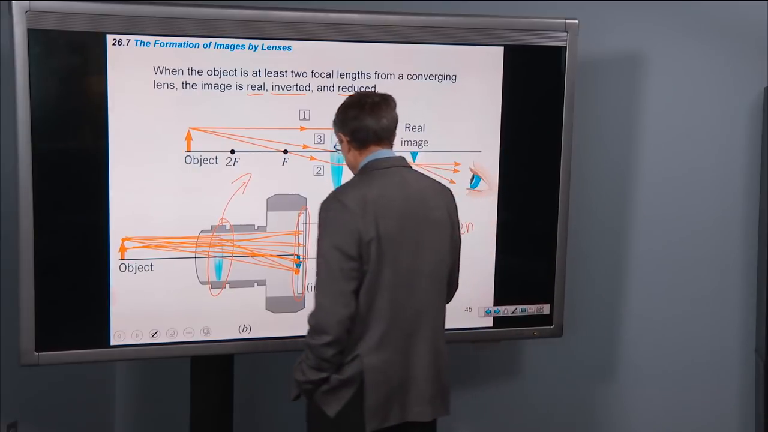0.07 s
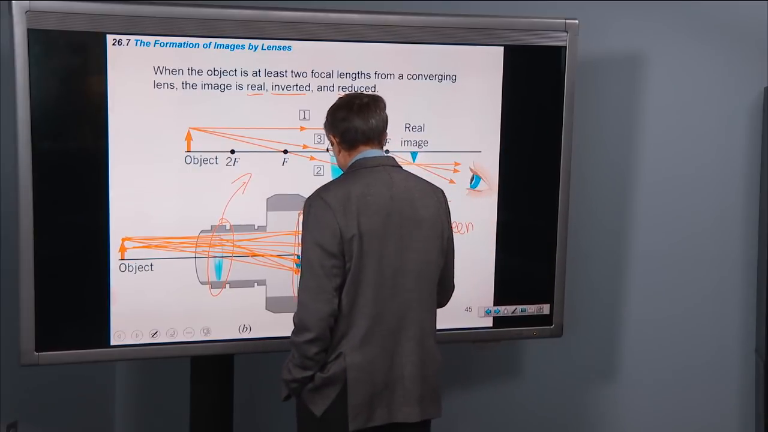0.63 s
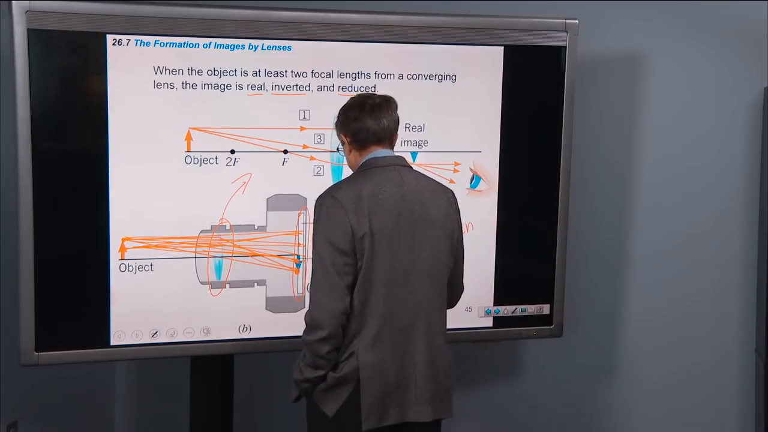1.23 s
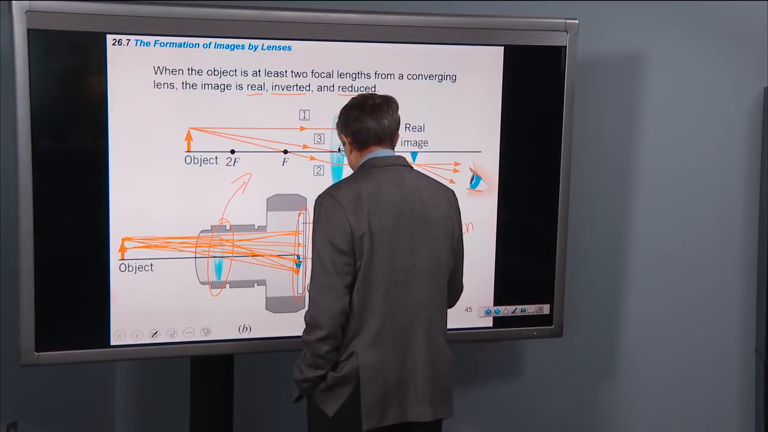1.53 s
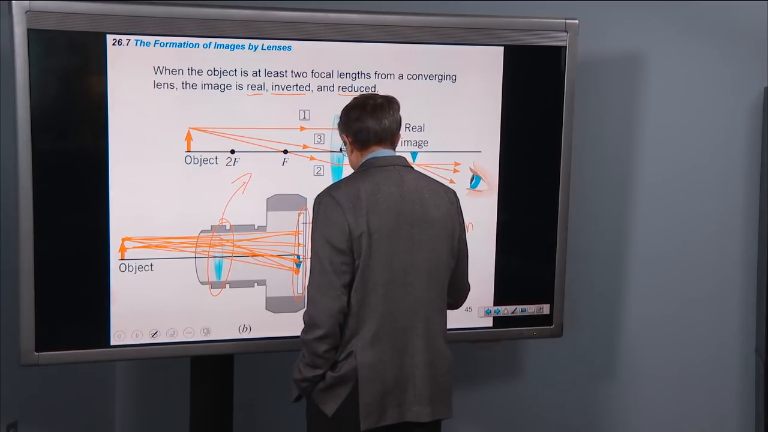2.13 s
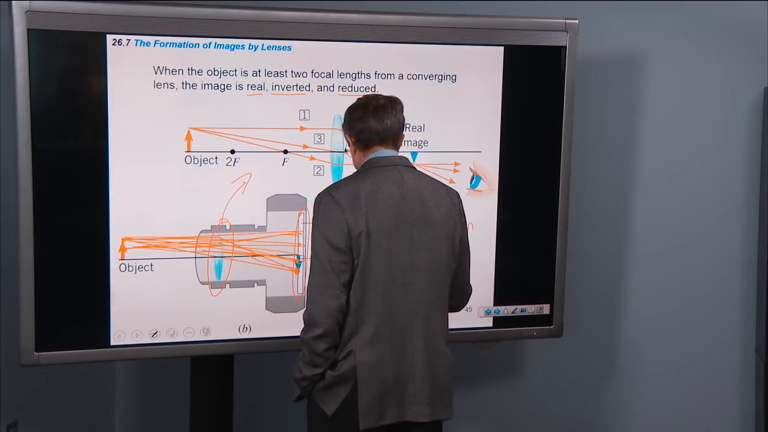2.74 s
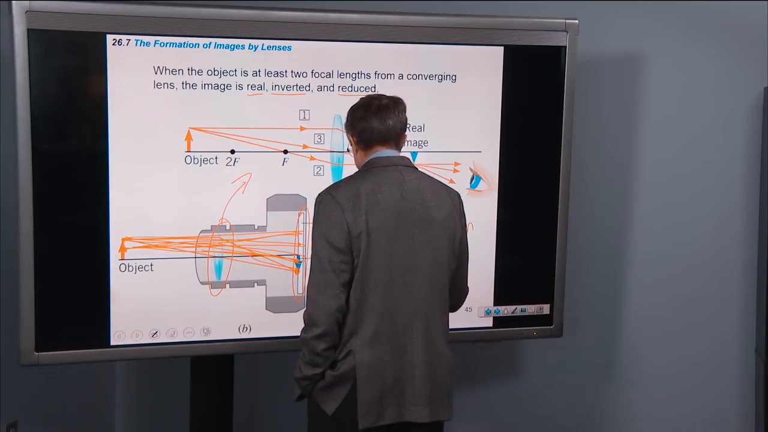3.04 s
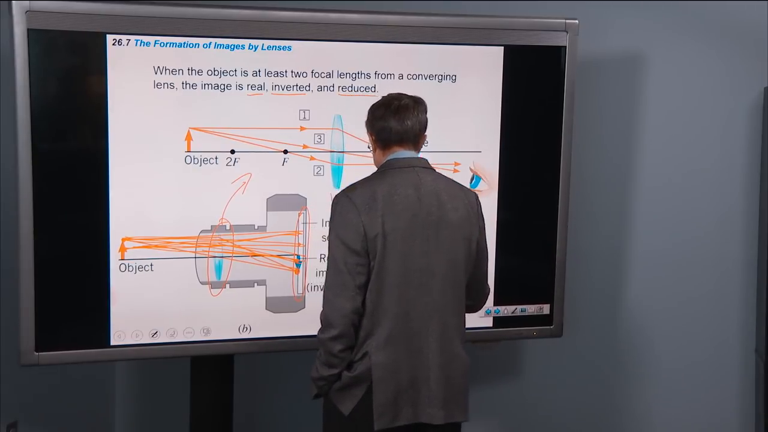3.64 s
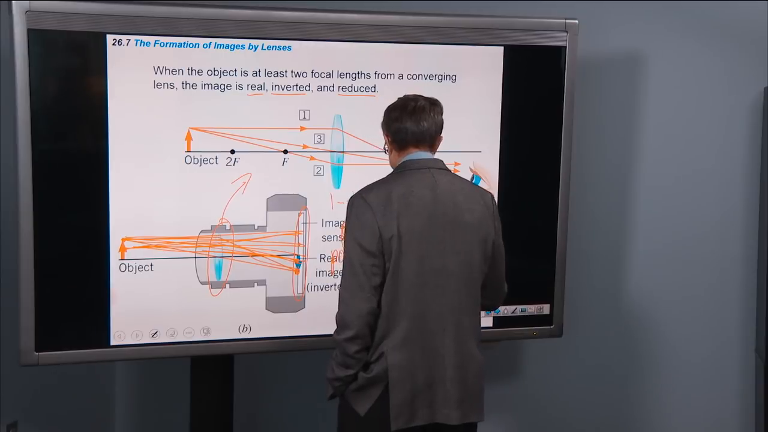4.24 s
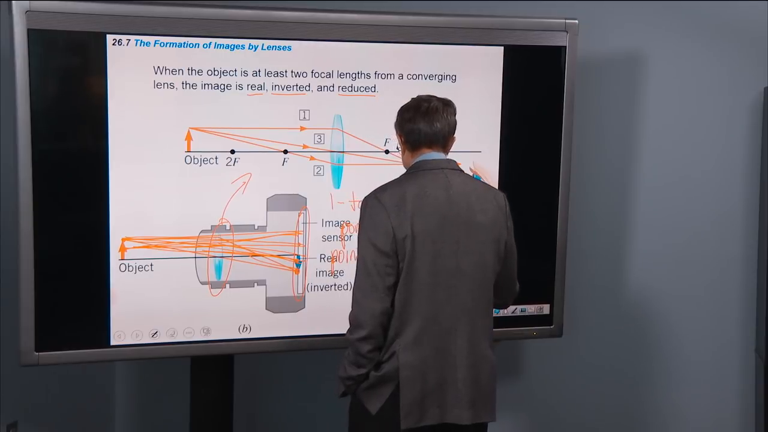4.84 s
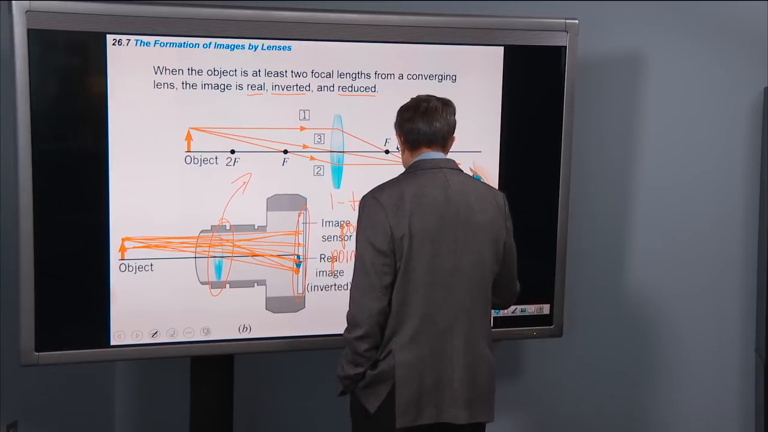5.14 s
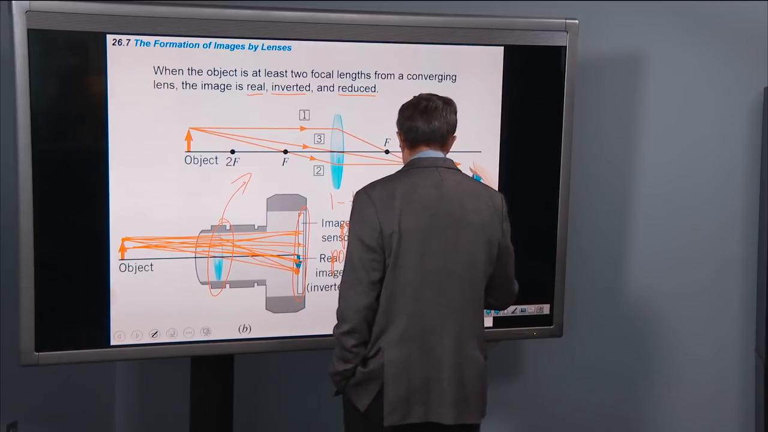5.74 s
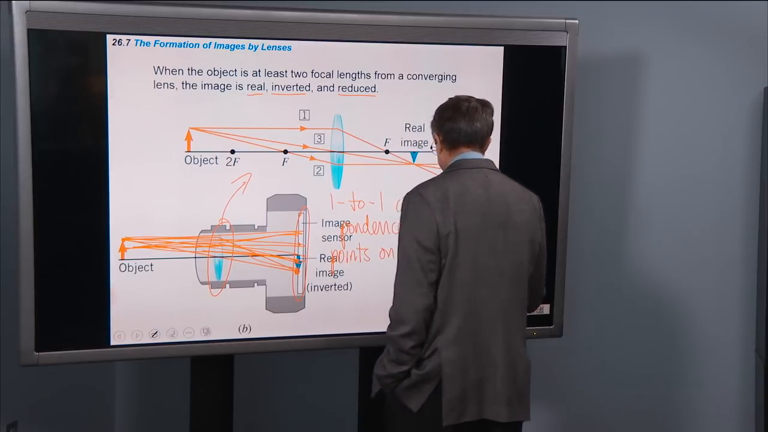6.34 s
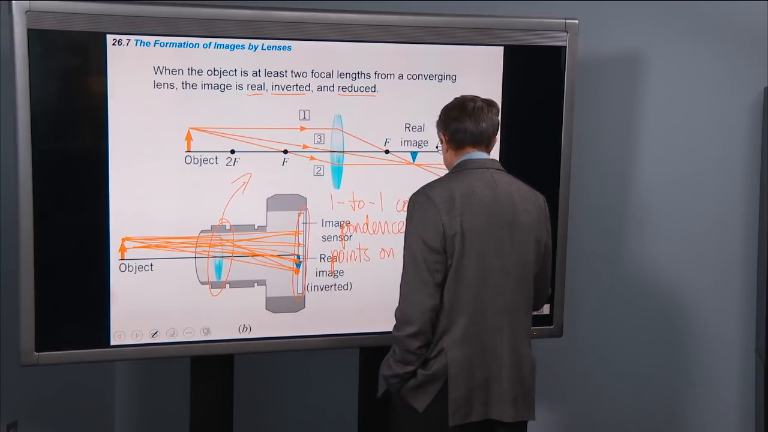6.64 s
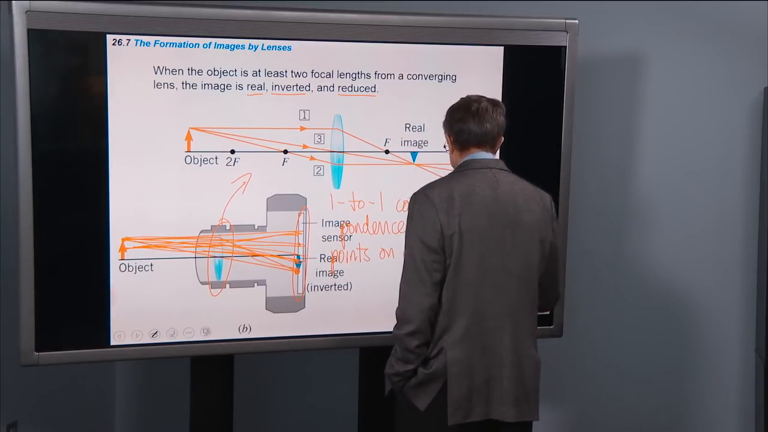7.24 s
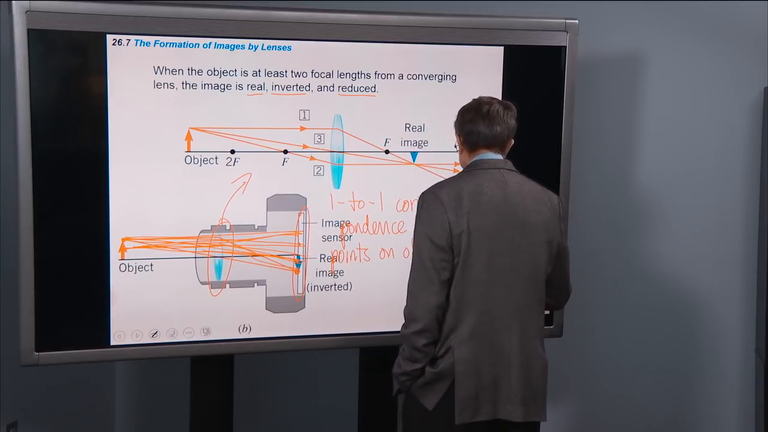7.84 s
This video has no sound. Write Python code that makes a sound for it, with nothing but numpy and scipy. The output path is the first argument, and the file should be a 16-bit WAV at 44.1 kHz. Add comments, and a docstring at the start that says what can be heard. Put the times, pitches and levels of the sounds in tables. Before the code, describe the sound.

A plastic stylus taps, rattles and scrapes on a large glass touchscreen, each tap knocking hollowly over soft ventilation hum.

```python
"""A quiet lecture room: someone writes with a plastic stylus on a wall-sized touchscreen.
Each touch is a sharp tick of the tip, then, a few ms later as the tip bottoms out, a clack and the hollow
knock of the glass panel. The loose tip rattles as it lands and slides, and at the very end it skids hard.
The writer steps along to the right with a shuffle and a rustle of the jacket. A faint squeak fades at the
start, a short breathy rush with a few dry clicks passes later, and ventilation hums behind it all."""
import sys
import numpy as np
from scipy import signal
from scipy.fft import rfft, irfft
from scipy.io import wavfile

SR = 44100
rng = np.random.default_rng(int(sys.argv[2]) if len(sys.argv) > 2 else 0)


def output_pcm(signal):
    """Save a mono or channel-first signal as 16-bit PCM at the path in sys.argv[1].

    Samples are clipped to [-1, 1] before scaling.
    """
    pcm = np.clip(np.atleast_2d(signal).T, -1, 1) * 32767
    wavfile.write(sys.argv[1], SR, np.round(pcm).astype(np.int16))


N = 352800
TIME = np.arange(N) / SR
USUAL_KNOCK_DB = -12

# the tip sliding on the glass: (start [s], end [s], level [dB])
STROKES = [(0.837, .884, -56.5), (1.058, 1.104, -57), (1.485, 1.561, -57), (2.14, 2.221, -55),
           (2.422, 2.532, -56.5), (3.05, 3.151, -57), (3.516, 3.54, -53.5), (3.708, 3.754, -56.5),
           (3.986, 4.074, -64), (5.685, 5.718, -54.5), (6.119, 6.156, -60), (6.624, 6.714, -59),
           (6.926, 7.007, -53.5), (7.312, 7.354, -57.5), (7.505, 7.581, -57), (7.737, 7.776, -55.5)]
# ring of the loose tip: (frequency [Hz], t60 [s], level [dB])
TIP_MODES = [(2034, 0.04, -11), (3296, 0.035, -11), (4260, 0.048, -20), (5300, 0.017, -0.5),
             (5440, 0.016, -13), (8560, 0.0084, -1.5), (9090, 0.016, -3), (9650, 0.0085, -18)]
# colour of a small, hard tick: (frequency [Hz], level [dB])
TICK_COLOUR = [(300, 15), (550, 8), (1200, -7), (3500, 3), (4400, -14.5), (7000, -6), (10000, -29),
               (15000, -55)]


def panel_knocks(times, db, place):
    """The glass flexes once; waves return from the frame and ring in modes set by the place struck."""
    # the first broad flexing under the pen: (frequency [Hz], t60 [s], level [dB])
    flex_modes = [(155, 0.037, -2), (470, 0.018, -0.5)]
    # ring of the glass: (frequency [Hz], t60 [s], level struck left [dB], level struck right [dB])
    glass_modes = [(105.1, 1, -34, -30.5), (139.3, 0.46, -15.5, -24), (167.85, 0.6, -39, -19),
                   (191.2, 0.26, -58, -21), (222.5, 0.73, -42, -23), (243, 0.14, -36, -21.5),
                   (290.6, 0.44, -28.5, -46), (356.5, 0.1, -15, -11), (422, 0.16, -17, -16),
                   (447, 0.056, -13.5, -21.5), (485.6, 0.24, -26.5, -19), (520, 0.036, -24, -37),
                   (575, 0.23, -39, -21.5), (640.5, 0.33, -35, -35), (931, 0.086, -25.5, -29),
                   (985, 0.13, -38, -27.5), (1194, 0.037, -23.5, -52)]
    # colour of the many weaker modes, blurred into a thud: (frequency [Hz], level [dB])
    thud_colour = [(25, -9), (60, -8), (90, 15), (130, -3), (230, -28), (310, 0.5), (400, 3), (520, -2),
                   (660, -6), (780, -17.5), (980, -22), (1500, -23), (3000, -55), (12000, -63)]
    blows = clicks(times, from_db(db))
    flex = sum((-1) ** k * from_db(level) * ring(blows, hz, t60)
               for k, (hz, t60, level) in enumerate(flex_modes))
    # a panel radiates its slowest motion poorly
    flex = signal.sosfilt(signal.butter(1, 85, "high", fs=SR, output="sos"), flex)
    returns = times + .00434  # back from the frame
    spread_db = 2 * rng.standard_normal((len(times), len(glass_modes)))
    ringing = 0
    for k, (hz, t60, left_db, right_db) in enumerate(glass_modes):
        strength = from_db(db + left_db + (right_db - left_db) * place + spread_db[:, k] - 1)
        ringing += (-1) ** k * ring(clicks(returns, strength), hz, t60)
    thud = swell(clicks(returns, from_db(db)), t60=.1, build_s=.018) * noise(thud_colour)
    return flex + ringing + from_db(-14.5) * thud


def tip_ticks(times, db):
    """Plastic meets glass: a short crack, the ring of the barrel and the crack's echo in the room."""
    # ring of the pen barrel: (frequency [Hz], t60 [s], level [dB])
    barrel_modes = [(1150, 0.0079, 12), (1310, 0.036, -3.5), (1583, 0.019, 1.5), (2081, 0.017, 2.5),
                    (3000, 0.002, 3), (2880, 0.011, 2.5), (3240, 0.0049, 10), (3524, 0.019, 0.5),
                    (4730, 0.018, 3), (6460, 0.0068, 0.5)]
    # the tick as the room returns it: (frequency [Hz], level [dB])
    echo_colour = [(300, 19.5), (550, -8), (1200, 6), (3500, -3.5), (4400, -6), (7000, -15), (10000, -35),
                   (15000, -55)]
    blows = clicks(times, from_db(db))
    crack = from_db(1.5) * swell(blows, t60=.035, build_s=.0053) * noise(TICK_COLOUR)
    early = from_db(-14.5) * swell(blows, t60=.15, build_s=.02)
    late = from_db(-22) * swell(blows, t60=.27, build_s=.04)
    return crack + (early + late) * noise(echo_colour) + pen_ring(times, db - 10, barrel_modes)


def tip_travel_s(knock_db, usual_s=.0038, longest_s=.0047, halving_db=9):
    """Time from first touch to bottoming out: a faster pen knocks harder and gets there sooner."""
    return np.minimum(usual_s * 2 ** ((USUAL_KNOCK_DB - knock_db) / halving_db), longest_s)


def tip_clacks(times, knock_db, growth=1.86):
    """The tip bottoms out; harder blows make shorter contact, so the clack grows faster than the knock."""
    # colour of the clack: (frequency [Hz], level [dB])
    colour = [(500, -17), (800, -4), (1000, 2), (1700, 6), (2300, -8), (3200, 0.5), (4500, -14),
              (8000, -19), (11000, -29), (15000, -50)]
    blows = clicks(times, from_db(growth * knock_db - 14))
    hit = swell(blows, t60=.026, build_s=.0032)
    tail = from_db(-21) * swell(blows, t60=.19, build_s=.028)
    return (hit + tail) * noise(colour)


def tip_rattles(landing, knock_db):
    """The loose tip knocks in its barrel, thin and bright, with a little room behind it."""
    # single clicks as the pen lifts or turns: (time [s], level [dB])
    flicks = [(0.3591, -52), (0.62, -53), (1.075, -42.5), (1.493, -39), (1.5576, -35), (1.9809, -46),
              (2.705, -52), (3.5253, -36), (4.4754, -50.5), (4.9227, -39), (5.108, -47), (6.1482, -39),
              (6.3949, -47), (7.008, -35), (7.3372, -38.5), (7.7427, -39), (7.9713, -34)]
    hits = jolts(landing, knock_db) + [(s, db - 6) for s, db in flicks] + shakes()
    times, db = np.transpose(hits)
    blows = clicks(times, from_db(db))
    envelope = from_db(-6) * dying(blows, t60=.019) + from_db(-27.5) * dying(blows, t60=.044)
    # colour of the rattle: (frequency [Hz], level [dB])
    colour = [(1500, -5.5), (3200, -10), (4200, 11.5), (5400, 5), (7300, 1.5), (9200, 4.5), (10300, -5),
              (15000, -29)]
    return envelope * noise(colour) + pen_ring(times, db - 3, TIP_MODES)


def jolts(landing, knock_db, delay_s=.0004, rebound_s=.0065, rebound_loss_db=4.5):
    """Each landing throws the loose tip at its barrel, with one rebound: (time [s], level [dB])."""
    times = landing + delay_s
    db = -35 + .71 * (knock_db - USUAL_KNOCK_DB)
    rebounds = times + rebound_s * rng.uniform(.5, 1.5, len(times))
    return [*zip(times, db), *zip(rebounds, db - rebound_loss_db)]


def shakes(count=16, gap_s=.011, over_rub_db=2, spread_db=2):
    """Sliding shakes the loose tip at uneven intervals: (time [s], level [dB])."""
    hits = []
    for start, end, db in STROKES:
        times = start + gap_s * (np.arange(count) + rng.random(count))
        levels = db + over_rub_db + spread_db * rng.standard_normal(count)
        hits += [(s, level) for s, level in zip(times, levels) if s < end]
    return hits


def pen_ring(times, db, modes):
    """Each contact strikes every mode with a strength and sign of its own."""
    chance = rng.standard_normal((len(times), 2, len(modes)))
    strength = np.sign(chance[:, 0]) * from_db(2.6 * chance[:, 1])
    return sum(ring(clicks(times, strength[:, k] * from_db(db + level)), hz, t60)
               for k, (hz, t60, level) in enumerate(modes))


def tip_rubbing(slips_per_s=400):
    """The sliding tip catches and slips at random, many times a stroke, and each slip rings it."""
    # colour of plastic rubbing on glass: (frequency [Hz], level [dB])
    colour = [(1500, -30), (3200, 19), (4000, -3), (5400, 16), (7000, -1), (9200, -1), (10200, -64),
              (14000, -40)]
    pressure = sum(from_db(db) * ((TIME > start) & (TIME < end)) for start, end, db in STROKES)
    slips = pressure * (rng.random(N) < slips_per_s / SR) * rng.standard_normal(N)
    ringing = sum(ring(slips, hz, t60) * from_db(level) for hz, t60, level in TIP_MODES)
    return from_db(-2.5) * dying(slips, t60=.019) * noise(colour) + from_db(-8.5) * ringing


def tip_skid(slips_per_s=1500):
    """Pressed hard, the tip chatters over the glass in fast, uneven slips."""
    # force of the skid: (time [s], relative level [dB])
    push = [(7.982, -90), (7.984, -33), (7.988, -35), (8.0, -32)]
    # colour of the scrape: (frequency [Hz], level [dB])
    colour = [(400, -11), (790, 16), (1300, -40), (2250, 10), (2700, 0), (3800, -7), (5300, -18),
              (7000, -8), (9200, -7), (14500, -27)]
    force = from_db(np.interp(TIME, *np.transpose(push), left=-200))
    slips = (rng.random(N) < slips_per_s / SR) * rng.standard_normal(N)
    return force * rms_one(dying(slips, t60=.0078) * noise(colour))


def wall_echoes(pen, knocks):
    """A near wall slaps back the pen's sounds, the far wall the bass of the knocks."""
    bass = signal.sosfilt(signal.butter(2, 285, fs=SR, output="sos"), knocks)
    return from_db(-22.5) * delayed(pen, delay_s=.026) + from_db(-13.5) * delayed(bass, delay_s=.0415)


def room_tail(times, db, place, zones=5, build_s=.0096):
    """Each zone of the panel has its own path through the room; the bass lasts longest."""
    # colour of the reverb: (frequency [Hz], level [dB])
    colour = [(25, -13), (60, -21), (90, -3), (135, 2.5), (240, 2), (320, -4.5), (500, -4.5), (750, -16),
              (1000, -20), (2000, -28.5), (3300, -36), (6000, -41), (9000, -39.5), (15000, -72)]
    # decay of the room: (frequency [Hz], t60 [s])
    decay = [(40, 1), (130, 0.54), (250, 0.65), (500, 0.46), (1500, 0.39), (5000, 0.43), (12000, 0.057)]
    octave = np.round(np.log2(np.clip(np.fft.rfftfreq(SR, 1 / SR), 64, 8192)))
    age, hiss, out = TIME[:SR], noise(colour), 0
    build_up = 1 - np.exp(-age / build_s)
    for zone in range(zones):
        share = np.maximum(1 - np.abs(place * (zones - 1) - zone), 0)
        blows = clicks(times, from_db(db) * np.sqrt(share))
        spectrum = rfft(hiss[zone * SR:(zone + 1) * SR])
        tail = sum(irfft(spectrum * (octave == k), SR) * from_db(-60 * age / at_hz(decay, 2 ** k))
                   for k in np.unique(octave))
        out += signal.fftconvolve(blows, tail * build_up)[:N]
    return out


def foot_shuffle():
    """Shoes press on the floor: a dull, soft rumble."""
    # the writer shifts from foot to foot: (time [s], level [dB])
    weight = [(2.82, -87), (2.845, -50), (2.93, -46.5), (3.05, -49.5), (3.2, -71), (3.68, -58), (3.74, -49),
              (3.85, -61), (3.95, -85)]
    # colour of the footfall: (frequency [Hz], level [dB])
    colour = [(30, -35), (90, -5), (150, 3), (240, -1.5), (400, -17), (800, -43), (2500, -34), (8000, -50),
              (13000, -75)]
    return fader(weight) * noise(colour)


def breathy_rush():
    """A faint, short, breathy rush of noise with a few faint dry clicks."""
    # rise and fall of the rush: (time [s], level [dB])
    rush = [(5.30, -70), (5.345, -53), (5.375, -44.5), (5.42, -49), (5.46, -58), (5.52, -72)]
    # colour of the rush: (frequency [Hz], level [dB])
    colour = [(100, -1.5), (240, -7), (350, 0), (520, -4), (680, 1), (800, -10), (1500, -16), (3000, -35),
              (10000, -49)]
    # faint dry clicks: (time [s], level [dB])
    dry_clicks = [(5.3138, -42), (5.371, -42), (5.3975, -37)]
    times, db = np.transpose(dry_clicks)
    click_envelope = dying(clicks(times, from_db(db)), t60=.0058)
    return fader(rush) * noise(colour) + click_envelope * noise(TICK_COLOUR)


def jacket_rustle():
    """Cloth slides over cloth as the writer steps."""
    # rise and fall of the rustle: (time [s], level [dB])
    movement = [(4.98, -66), (5.1, -65), (5.2, -59), (5.28, -71)]
    # colour of the cloth: (frequency [Hz], level [dB])
    colour = [(200, -4), (700, 1), (1100, -1), (1800, -1.5), (2800, -11), (6000, -18), (12000, -36)]
    return fader(movement) * noise(colour)


def faint_squeak(t60=.72):
    """Two narrow resonances die away in the room."""
    # bands of the squeak: (frequency [Hz], width [Hz], starting rms level [dB])
    resonances = [(830, 120, -50), (1610, 120, -57)]
    bands = sum(from_db(db) * rms_one(ring(rng.standard_normal(N), hz, np.log(1000) / (np.pi * width)))
                for hz, width, db in resonances)
    return bands * from_db(-60 * TIME / t60)


def ventilation(air_db=-52, air_top_hz=12000):
    """A bed of soft air noise with a few wavering fan tones."""
    # colour of the moving air: (frequency [Hz], level [dB])
    colour = [(20, -0.5), (45, -15), (65, -8.5), (105, -8.5), (140, -1), (200, -8), (290, -9.5), (380, -14),
              (450, -11), (560, -19.5), (800, -20), (1340, -28), (1800, -29.5), (5000, -35.5), (12000, -43)]
    # fan tones: (frequency [Hz], rms level [dB])
    hum = [(102, -58), (651, -71.5), (1303, -76), (1954, -82.5), (10400, -94)]
    air = signal.sosfilt(signal.cheby1(10, .5, air_top_hz, fs=SR, output="sos"), noise(colour))
    phase_drift = 3.61 * np.cumsum(rng.standard_normal((len(hum), N)), axis=1) / np.sqrt(SR)
    tones = sum(from_db(db) * np.sqrt(2) * np.sin(2 * np.pi * hz * TIME + drift)
                for (hz, db), drift in zip(hum, phase_drift))
    return from_db(air_db) * air + tones


def from_db(db):
    """Decibels to gain."""
    return 10 ** (np.asarray(db) / 20)


def rms_one(x):
    """Scale to unit rms."""
    return x / np.sqrt(np.mean(x ** 2) + 1e-20)


def at_hz(points, hz):
    """Read a table on a log-frequency axis."""
    f, value = np.transpose(points)
    return np.interp(np.log(hz), np.log(f), value)


def fader(points):
    """Gain riding through (time [s], level [dB]) points, silent outside them."""
    return from_db(np.interp(TIME, *np.transpose(points), left=-200, right=-200))


def clicks(times, heights):
    """A train of single-sample pulses."""
    out = np.zeros(N)
    np.add.at(out, np.clip(np.round(times * SR).astype(int), 0, N - 1), heights)
    return out


def ring(x, hz, t60):
    """A unit click sets a sine of height 1 ringing."""
    r, w = from_db(-60 / (t60 * SR)), 2 * np.pi * hz / SR
    return signal.lfilter([0, np.sin(w)], [1, -2 * r * np.cos(w), r * r], x + 1e-18)


def dying(blows, t60):
    """Envelope of the energy that each blow leaves behind."""
    keep = from_db(-120 / (t60 * SR))
    return np.sqrt(signal.lfilter([1], [1, -keep], blows ** 2 + 1e-24))


def swell(blows, t60, build_s):
    """A dying envelope with a softened attack."""
    return np.sqrt(np.maximum(dying(blows, t60) ** 2 - dying(blows, min(build_s, t60 / 2)) ** 2, 0))


def noise(colour):
    """Steady noise of a given colour, rms 1."""
    hz = np.maximum(np.fft.rfftfreq(N, 1 / SR), 1)
    return rms_one(irfft(rfft(rng.standard_normal(N)) * from_db(at_hz(colour, hz)), N))


def delayed(x, delay_s):
    """The same sound, arriving later."""
    return np.interp(TIME - delay_s, TIME, x, left=0)


def scene():
    """Pen and panel up front, writer and room behind, in mono."""
    # pen touches: (time [s], tick level [dB], knock level [dB])
    taps = [(0.1227, -27, -16.5), (.777, -26, -14), (1.261, -28.5, -14.5), (1.526, -28, -14),
            (1.688, -25.5, -11), (2.184, -25, -9), (2.4594, -28.5, -13), (3.068, -26, -6),
            (3.4562, -27, -7), (3.726, -53.5, -33.5), (4.3537, -34, -33), (4.8748, -24.5, -11),
            (5.4677, -30, -12.5), (5.7223, -29, -10), (5.931, -24.5, -9), (6.3174, -31.5, -16),
            (6.645, -27, -9), (6.9515, -28.5, -8.5), (7.2318, -28.5, -12)]
    # the pen's path across the panel: (time [s], place [0 left to 1 right])
    path = [(0, 0.15), (1.6, 0.051), (2.3, 0.19), (3.07, .03), (3.46, 0.31), (4.87, 0.76), (5.45, .96),
            (8, 0.88)]
    touch, tick_db, knock_db = np.transpose(taps)
    landing = touch + tip_travel_s(knock_db)
    place = np.interp(touch, *np.transpose(path))
    knocks = panel_knocks(landing, knock_db, place)
    tail = from_db(-20) * room_tail(landing + .0061, knock_db, place)
    background = foot_shuffle() + breathy_rush() + jacket_rustle() + faint_squeak() + ventilation()
    pen = tip_ticks(touch, tick_db) + tip_clacks(landing, knock_db)
    pen += tip_rubbing() + tip_skid() + tip_rattles(landing, knock_db)
    return (pen + knocks + wall_echoes(pen, knocks) + tail + background)[None]


def record(dry):
    """A steep high cut at 15.3 kHz."""
    return signal.sosfilt(signal.ellip(10, .2, 80, 15300, fs=SR, output="sos"), dry)


dry = scene()
out = record(dry)
output_pcm(out)
```